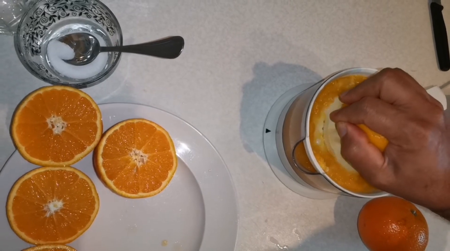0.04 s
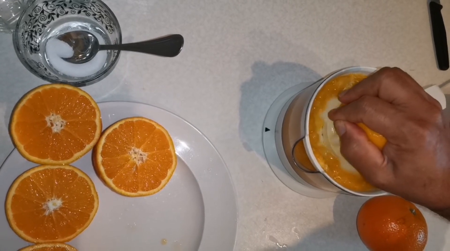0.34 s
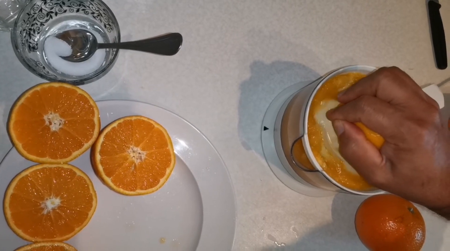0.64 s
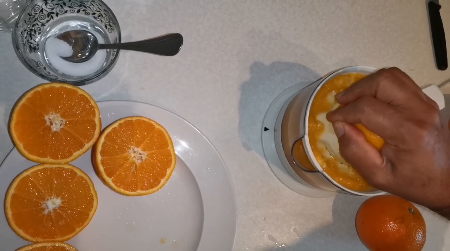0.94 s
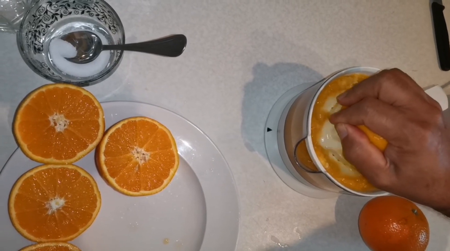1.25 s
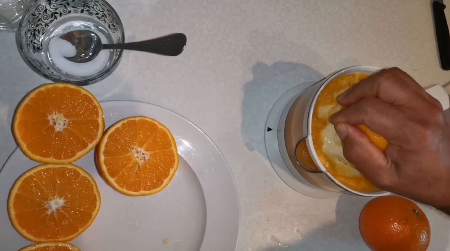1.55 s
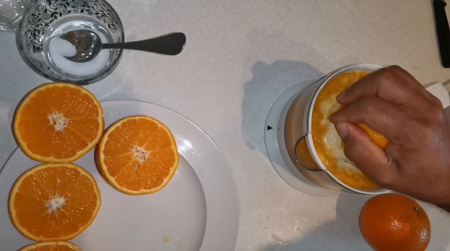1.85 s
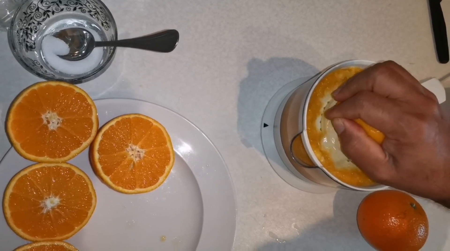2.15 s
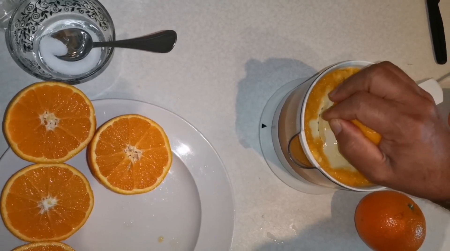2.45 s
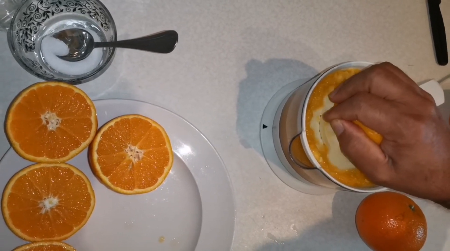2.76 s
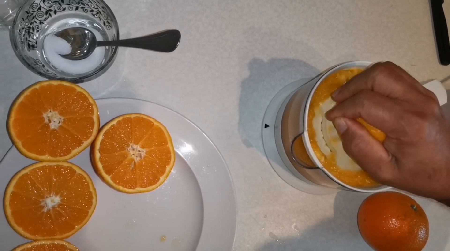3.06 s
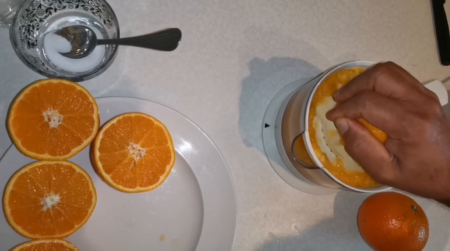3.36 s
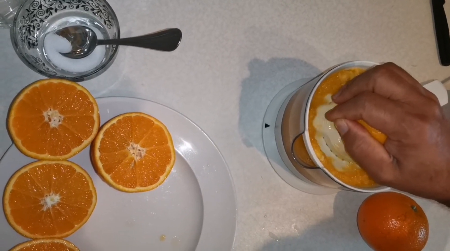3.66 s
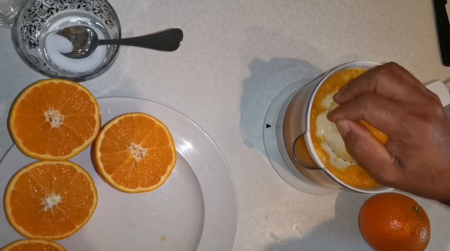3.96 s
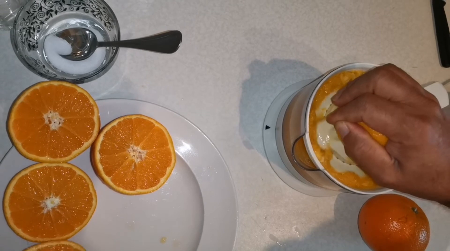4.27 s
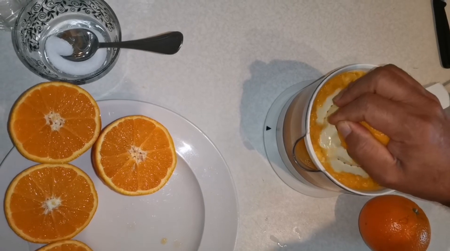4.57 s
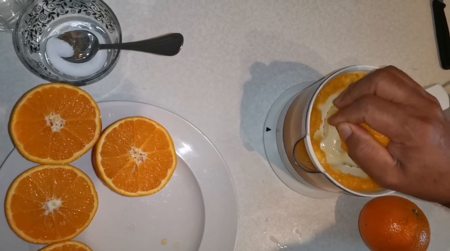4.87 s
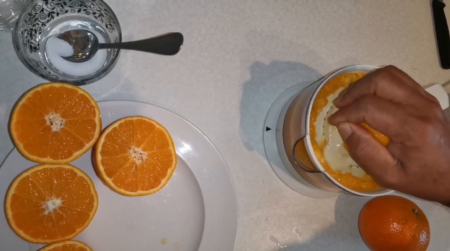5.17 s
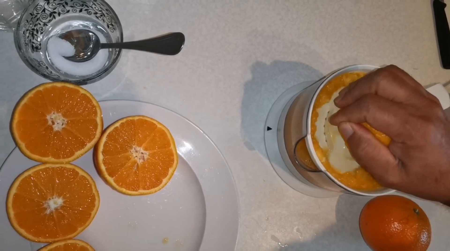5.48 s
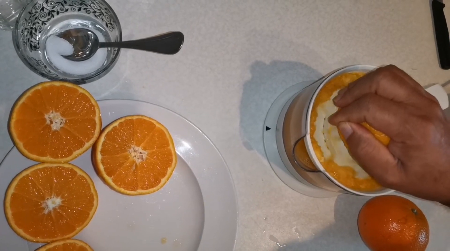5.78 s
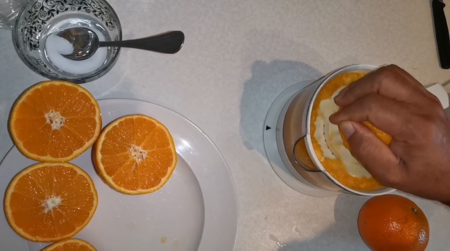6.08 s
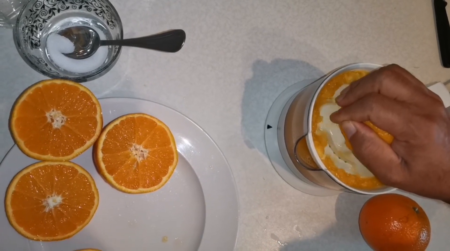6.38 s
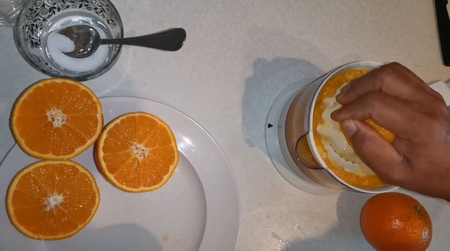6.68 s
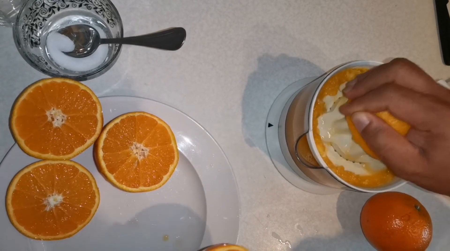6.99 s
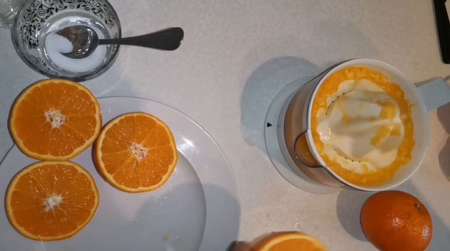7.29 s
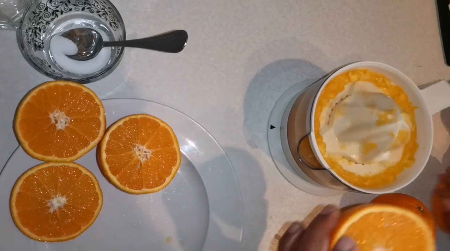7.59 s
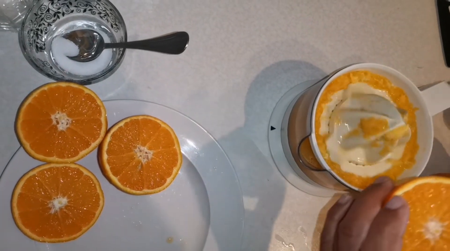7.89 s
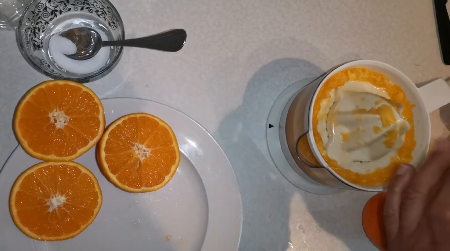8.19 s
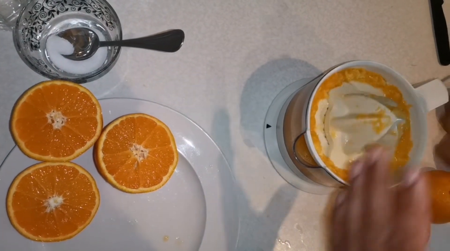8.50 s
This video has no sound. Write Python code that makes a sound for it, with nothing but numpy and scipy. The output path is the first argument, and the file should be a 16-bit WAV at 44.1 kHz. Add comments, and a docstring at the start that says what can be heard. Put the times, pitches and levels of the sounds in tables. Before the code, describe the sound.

Close up in a quiet kitchen, a juicer's motor and gears drone steadily as the reamer turns inside an orange half, with faint spits and pops of pulp. After about seven seconds the pressure comes off, and the spinning reamer breaks into a loud, irregular plastic clatter with hollow knocks and wet clicks.

```python
"""Citrus press on a kitchen counter

One microphone, close up, in a quiet kitchen. Half an orange is held on the reamer of an electric press.
The mains motor shakes a plastic gear train that growls in the housing; the fruit rumbles on the ribs,
pulp squelches, and later the rind catches and sings. Near the end the hand lets go, and the unloaded
reamer rattles and knocks loudly in its strainer."""
import sys
import numpy as np
from scipy import signal
from scipy.fft import rfft, irfft, next_fast_len
from scipy.io import wavfile
from scipy.ndimage import uniform_filter1d

SR = 44100
rng = np.random.default_rng(int(sys.argv[2]) if len(sys.argv) > 2 else 0)


def wrap_up_sound(samples):
    """Save the sound to the file named by the first command line argument, as 16-bit audio."""
    columns = np.atleast_2d(samples).T
    # keep every value between -1 and 1, then stretch to whole-number steps
    tamed = np.clip(columns, -1, 1)
    steps = np.round(tamed * 32767).astype(np.int16)
    wavfile.write(sys.argv[1], SR, steps)


N = 381024
TIME = np.arange(N) / SR
MAINS_HZ, WHEEL_HZ, REAMER_HZ, ROTOR_BEAT_HZ = 50, 6.485, 0.985, 41.75

# broad response of the strainer: (frequency [Hz], level [dB])
STRAINER_SLOPE = [(155, -17), (220, -23), (265, -12.5), (520, -17.5), (1000, -14.9), (1500, -14.0),
                  (2400, -10.0), (3000, -18.2), (4000, -25.0), (5800, -33.1), (8800, -37.7), (12300, -44.9),
                  (15500, -64.7)]
# resonances of the strainer's sound, and one shallow dip: (frequency [Hz], width [Hz], lift [dB])
STRAINER_MODES = [(384, 52, 13.5), (470, 26, 6), (606, 44, 7.6), (694, 47, 10), (742, 34, 4.5),
                  (920, 130, 6.7), (1295, 80, 6.5), (2230, 120, 4.5), (2468, 49, 4.5), (2700, 40, 4),
                  (2570, 200, 4.5), (4773, 720, 7), (5202, 188, 8), (5900, 900, -3), (7200, 400, 8.5),
                  (9480, 260, 12)]
# how wildly the free reamer shakes: (time [s], level [dB])
SHAKE = [(6.7, -4.5), (7.0, -12), (7.04, -3.5), (7.66, -0.5), (7.76, -6), (8.02, -4), (8.08, -11),
         (8.13, -2), (8.36, -7.5), (8.64, -1.5)]


def from_db(db):
    """Decibels to gain."""
    return 10 ** (np.asarray(db) / 20)


def rms_one(x):
    """Scale to rms 1."""
    return x / np.sqrt(np.mean(x ** 2) + 1e-20)


def band(x, low_hz, high_hz, order=2):
    """Causal band-pass."""
    sos = signal.butter(order, [low_hz, min(high_hz, .48 * SR)], "band", fs=SR, output="sos")
    return signal.sosfilt(sos, x + 1e-18)


def evened(x, size=3000):
    """Hold the rms at 1 over a window of so many samples; faster grain stays."""
    power = uniform_filter1d(uniform_filter1d(x ** 2, size=size), size=size * 3 // 4)
    return x / np.sqrt(power + 1e-14)


def curve(rows):
    """A (time, value) curve at every sample."""
    return np.interp(TIME, *np.transpose(rows))


def drift(hz):
    """A random wander of rms 1 that turns hz times a second."""
    knots = np.arange(0, TIME[-1] + 1, 1 / hz)
    return rms_one(np.interp(TIME, knots, rng.standard_normal(1000)[:len(knots)]))


def throb(hz, depth_db):
    """A periodic swell of force."""
    return from_db(depth_db * np.cos(2 * np.pi * (hz * TIME + rng.random())))


def turning(turn_hz, swells):
    """Gain that swells and sinks in the same way on every turn or cycle."""
    return from_db(sum(db * np.cos(2 * np.pi * k * turn_hz * (TIME - peak_s)) for k, db, peak_s in swells))


def grains(per_s, spread_db):
    """Clicks at random moments, of random sign and size."""
    clicks = (rng.random(N) < per_s / SR) * rng.choice([-1, 1], N)
    return clicks * from_db(spread_db * np.clip(rng.standard_normal(N), -2, 2))


def burst(decay_s, per_s, attack_s=0.0007):
    """A cluster of clicks that swells within milliseconds and dies away."""
    t = TIME[:SR // 12]
    cluster = rng.uniform(-1.06, 1, len(t)) * (rng.random(len(t)) < per_s / SR)
    return cluster * np.minimum(t / attack_s, 1) * np.exp(-t / decay_s) + 1e-12


def add(out, s, sound, db):
    """Mix a sound in at time s, with the energy of 5 ms at the given level."""
    start = int(s * SR)
    sound = sound * np.sqrt(.005 * SR) / np.linalg.norm(sound)
    out[start:start + len(sound)] += (from_db(db) * sound)[:N - start]


def body(x, slope, modes=()):
    """Ring a body: a causal filter made of a slope, its main resonances and a crowd of small high modes."""
    size = next_fast_len(N + SR // 2)
    hz = np.maximum(np.arange(size // 2 + 1) * SR / size, 1)
    points, levels = np.transpose(slope)
    db = np.interp(np.log(hz), np.log(points), levels)
    db -= 10 * np.log10(1 + np.minimum((.75 * points[0] / hz) ** 8, 1e4))   # bass falls away
    for centre, width, lift in modes:
        db += lift / (1 + (2 * (hz - centre) / width) ** 2)
    crowd_hz = np.arange(2800, 16000, 70)
    db += np.interp(hz, crowd_hz, rng.normal(0, 2.3, len(crowd_hz)), left=0)
    cepstrum = irfft(np.log(from_db(db)), size)
    minimum_phase = np.exp(rfft(2 * cepstrum[:size // 2], size) - cepstrum[0])
    return irfft(rfft(x, size) * minimum_phase, size)[:N]


def kitchen(x, wet_db, t60):
    """Direct sound at the microphone plus a short diffuse tail off tiles and cupboards."""
    t = TIME[:SR // 2]
    tail = rng.standard_normal(len(t)) * from_db(-60 * t / t60) * (t > .004)
    return x + from_db(wet_db) * signal.fftconvolve(x, tail / np.linalg.norm(tail))[:N]


def room_tone():
    """The still air of the kitchen, faint behind the press."""
    # spectrum of the air: (frequency [Hz], level [dB])
    air_slope = [(20, -14), (50, -11), (200, -8.5), (1000, -6), (5000, -24), (15000, -49)]
    return from_db(-55) * rms_one(body(rng.standard_normal(N), air_slope))


def gears(freed):
    """Tooth contacts ring the housing and chug with each turn of the out-of-true wheel."""
    # broad response of the housing: (frequency [Hz], level [dB])
    housing_slope = [(450, -36), (560, -28.5), (680, -13), (1000, -12), (1400, -26), (2050, -20.5),
                     (2700, -22), (3700, -45), (4600, -40), (5700, -60.5), (8500, -58.5), (12000, -50.5),
                     (15500, -75)]
    # resonances of the gear sound, and one narrow dip in the growl: (frequency [Hz], width [Hz], lift [dB])
    gear_modes = [(701.8, 19, 8.5), (755, 46, 8.5), (768, 18, -10.5), (862, 68, 6), (1170, 120, 0.5),
                  (1277, 156, 14.5), (1575, 71, 11), (2390, 244, 14), (2590, 96, 8), (3300, 480, 19),
                  (4860, 520, 4.5), (5290, 210, 15.5), (6400, 930, 18.5)]
    # meshing tones: (frequency [Hz], level against the growl's noise [dB])
    mesh_tones = [(691.8, -2), (701.6, -5), (714.6, -5), (743.5, -5), (750, -10)]
    # the low growl, and the push of the hand heard as clatter: (time [s], level [dB])
    growl_levels = [(0, -34), (0.35, -36.5), (.7, -34), (1.1, -34), (1.7, -32.5), (2.1, -34), (2.8, -34),
                    (3.25, -32), (3.5, -36.5), (3.72, -37.5), (3.85, -33), (4.33, -36), (4.5, -34),
                    (5.5, -34.5), (5.72, -37.5), (6.15, -34), (6.36, -35.5), (6.55, -34), (6.72, -33),
                    (6.85, -57), (7.2, -40.5)]
    push_levels = [(0, -37), (0.8, -37.5), (2.15, -35.5), (2.5, -37), (3.55, -36), (3.82, -35.5),
                   (5.8, -36.5), (6.7, -34.5), (6.93, -32)]
    # periodic swells, each (swells per cycle [count], depth [dB], peak time [s])
    torque_pulses = [(1, 1.35, .0055), (2, .35, .0023)]   # twice per mains cycle
    rotor_beat = [(1, .7, .0105)]   # the rotor beats against the gears
    rib_bite = [(1, .7, .02), (2, .4, .455), (3, .45, .06)]   # the ribs bite the fruit alike on every turn
    wheel_growl = [(1, 2.9, .134), (2, .5, .014), (3, 1.0, .04)]   # the wheel's chug in three bands
    wheel_clatter = [(1, 1.3, .152)]
    wheel_whine = [(1, 1.3, .013), (2, .85, .007), (3, .3, .049)]
    # strength of the chug in growl and clatter: (time [s], depth [factor])
    chug_depths = [(0, 1.3), (.8, 1), (1.4, 0.82), (2.9, 0.6), (3.5, 0.34), (4.4, 0.72), (5.1, 0.63),
                   (5.9, 1.1), (6.6, 0.93)]
    # the teeth catch on some turns: (time [s], half length [s], whine lift [dB], rasp lift [dB])
    catches = [(1.083, .035, 3, -2), (1.17, 0.046, -7, 2.5), (3.08, .025, 4.5, -9), (3.165, 0.045, -3.5, 2),
               (3.397, 0.039, 5.5, 2), (4.17, 0.04, 4, -1), (4.782, 0.019, 6.5, -9), (6.022, 0.017, 8, 3),
               (6.106, 0.034, 6, -10), (6.185, 0.012, 7, 5), (6.303, .055, -3, 6.5)]

    torque = turning(2 * MAINS_HZ, torque_pulses)
    contacts = grains(per_s=12000, spread_db=3) * torque
    housing = body(kitchen(contacts, wet_db=-6.5, t60=0.23), housing_slope, gear_modes)
    mesh = sum(from_db(db) * np.sqrt(2) * np.sin(2 * np.pi * hz * TIME + .4 * drift(4))
               for hz, db in mesh_tones)
    chug = curve(chug_depths)
    growl = evened(rms_one(band(housing, 590, 811, order=5)) + mesh, size=1000)
    growl *= from_db(curve(growl_levels)) * turning(WHEEL_HZ, wheel_growl) ** chug
    clatter = evened(band(housing, 825, 1875, order=5), size=1500)
    clatter *= turning(WHEEL_HZ, wheel_clatter) ** chug
    whine_db, rasp_db = -14, -19   # against the clatter
    for s, half_s, whine_lift, rasp_lift in catches:
        catch = np.exp(-np.minimum(((TIME - s) / half_s) ** 2, 20))
        whine_db += whine_lift * catch
        rasp_db += rasp_lift * catch
    whine = from_db(whine_db) * evened(band(housing, 1954, 2983, order=5))
    whine *= turning(WHEEL_HZ, wheel_whine)
    rasp = from_db(rasp_db) * evened(band(housing, 2890, 4000, order=5))
    sliding_hiss = from_db(-58.5) * evened(band(housing, 3910, 15300, order=5)) * (1 - freed)
    push = from_db(curve(push_levels) - 10 * freed)   # the teeth ease once the load is off
    sound = torque * (growl + push * (whine + rasp))
    sound += np.sqrt(torque) * (push * clatter + sliding_hiss)
    return sound * turning(ROTOR_BEAT_HZ, rotor_beat) * turning(REAMER_HZ, rib_bite)


def motor(freed):
    """Mains hum, weaker without load, and the fruit rumbling on the ribs; both swell with each turn."""
    # motor hum: (frequency [Hz], level [dB])
    hum_tones = [(50, -73), (100, -63), (300, -70)]
    # drag on the reamer: (swells per turn [count], depth [dB], peak time [s])
    drag_swells = [(1, 2.2, 0.76), (2, 1.2, 0.38), (3, 1.3, 0.011)]
    # grip of the fruit on the ribs, heard as rumble: (time [s], level [dB])
    grip_levels = [(0, -51), (0.95, -54.5), (1.85, -51), (2.75, -53), (3.45, -50.5), (3.8, -52.5),
                   (4.3, -52), (4.75, -55), (5.7, -50.5), (6.5, -54.5), (6.87, -44), (7.15, -51)]
    # broad response of the motor base on the counter: (frequency [Hz], level [dB])
    base_slope = [(85, -22), (102, 2.5), (170, 6), (225, -15), (260, -0.5), (390, 9), (470, -15),
                  (3000, -51), (12000, -83)]
    # its resonances: (frequency [Hz], width [Hz], lift [dB])
    base_modes = [(93.6, 13.8, 16.5), (147.8, 18, 10.8), (280, 44, 9.1)]
    hum = sum(from_db(db) * np.sqrt(2) * np.sin(2 * np.pi * (hz * TIME + rng.random()))
              for hz, db in hum_tones)
    rumble = evened(body(grains(per_s=830, spread_db=9.5), base_slope, base_modes))
    drag = turning(REAMER_HZ, drag_swells)
    return drag * (from_db(-14 * freed) * hum + from_db(curve(grip_levels)) * rumble)


def bubbles(hz, length_s, count=4, ring_s=.001, rise_per_s=5):
    """A few bubbles in quick succession, each a soft ping that rises in pitch."""
    born = 2 * length_s * np.arange(count)[:, None] / count
    age = np.maximum(TIME[:SR // 12] - born, 0)
    pitch = hz * (1 + .02 * rng.standard_normal((count, 1)))
    phase = 2 * np.pi * pitch * age * (1 + rise_per_s * age)
    return np.sum(age * np.exp(-age / ring_s) * np.sin(phase), axis=0)


def pulp(freed, tick_decay_s=0.0058):
    """Bursting juice sacs bubble and spit droplets; lone ones tick, and the smallest fizz softly."""
    # sacs burst: (time [s], decay [s], bubble level [dB], pitch [Hz], spray level [dB], spray top [Hz])
    squelches = [(.1525, 0.003, -54, 6000, -49, 11500), (.321, 0.0098, -53, 5800, -53.5, 15500),
                 (0.499, .024, -56, 6110, -52.5, 15500), (.558, 0.014, -63, 6190, -55, 15000),
                 (0.6485, 0.004, -51, 6050, -49, 14500), (.833, 0.0076, -44, 4470, -57.5, 8100),
                 (1.639, .02, -62, 4830, -57, 13000), (3.53, .008, -51, 6240, -55, 15500),
                 (3.569, 0.013, -52, 4770, -57, 15000), (3.639, .025, -50, 4700, -58, 10000),
                 (4.543, .005, -60, 6150, -52.5, 14000), (4.569, .004, -59, 5940, -54.5, 13500),
                 (5.231, 0.011, -46, 7150, -52, 12500), (5.657, 0.025, -52, 4970, -57, 11500),
                 (5.687, 0.0064, -33, 4900, -47, 8800), (5.781, 0.0091, -44, 4200, -52.5, 10000),
                 (6.253, 0.0046, -51, 6200, -52.5, 12500), (6.675, .0053, -49, 4600, -57, 13500)]
    # a sac snaps or a drop is flung against the bowl: (time [s], level [dB], pitch [Hz])
    ticks = [(.123, -58, 12000), (.463, -57, 12000), (.878, -51, 4340), (1.157, -55, 7000),
             (1.9235, -52, 6230), (2.1909, -52, 6240), (2.623, -49, 4650), (2.852, -53, 4380),
             (3.693, -53, 7540), (3.761, -47, 4830), (4.292, -47, 4840), (4.3143, -47, 6900),
             (4.671, -50, 8050), (5.0725, -48, 8100), (5.574, -50.5, 9000), (6.594, -48.5, 6150),
             (6.708, -46, 4830), (7.177, -40, 5470), (7.198, -42, 6500), (7.238, -40, 5000),
             (7.261, -42, 5500), (7.3, -38, 5500), (7.359, -40, 5550), (7.444, -35, 5000),
             (7.589, -33.5, 5200), (7.628, -37, 5000), (8.138, -35, 5000), (8.43, -47.5, 5100),
             (8.529, -34, 5000)]
    # spray of tiny droplets: (frequency [Hz], level [dB])
    spray_slope = [(4500, 9.5), (6200, 9.5), (9000, 4), (12000, 6), (15500, -3)]
    # the dip that the bowl leaves in it: (frequency [Hz], width [Hz], lift [dB])
    bowl_dip = [(5360, 370, -6)]
    pops, spray = np.zeros(N), np.zeros(N)
    for s, decay_s, db, hz, spray_db, top_hz in squelches:
        add(pops, s, bubbles(hz, decay_s), db)
        droplets = burst(decay_s, per_s=1500, attack_s=0.4 * decay_s)
        add(spray, s, band(droplets, 4100, top_hz, order=5), spray_db)
    for s, db, hz in ticks:
        add(pops, s, band(burst(tick_decay_s, per_s=5000), hz / 1.15, hz * 1.07, order=1), db)
    small_sacs = sum(band(grains(per_s=22, spread_db=3), .85 * hz, 1.15 * hz) / np.sqrt(hz)
                     for hz in np.geomspace(4300, 11000, 10))
    small_sacs = signal.fftconvolve(small_sacs, burst(tick_decay_s, per_s=4000))[:N]
    fizz = from_db(-68.5 + 2.7 * drift(18)) * rms_one(small_sacs) * (1 - freed)   # comes in clumps
    pops = kitchen(pops, wet_db=-8, t60=.25)
    return pops + kitchen(body(spray, spray_slope, bowl_dip) + fizz, wet_db=-8, t60=.28)


def rind():
    """The rind sticks and slips: rough tones that swell and fade, pulsed by the motor."""
    # the rind catches on the reamer and sings: (start [s], length [s], pitch [Hz], level [dB])
    rubs = [(4.59, 1.64, 1290, -38.5), (5.843, 1.4, 1330, -38), (6.802, 0.25, 947, -32.5)]
    slips = signal.sosfilt(signal.butter(2, 48, fs=SR, output="sos"), rng.standard_normal((2, N)))
    out = np.zeros(N)
    for start, length, hz, db in rubs:
        swell = np.sin(np.pi * np.clip((TIME - start) / length, 0, 1))
        phase = 2 * np.pi * hz * TIME
        out += from_db(db) * swell * evened(slips[0] * np.cos(phase) + slips[1] * np.sin(phase))
    return out * throb(MAINS_HZ, depth_db=3.5)


def reamer(freed):
    """The unloaded reamer chatters in the strainer; harder shaking brings more thud and edge."""
    # surges with the gear wheel: (swells per turn [count], depth [dB], peak time [s])
    surges = [(1, 1.5, 0.14), (2, .5, 0.121)]
    chatter = grains(per_s=2200, spread_db=2) * throb(2 * MAINS_HZ, depth_db=2.4)
    chatter *= from_db(1.7 * drift(100))
    strainer = body(kitchen(chatter, wet_db=-6.5, t60=0.3), STRAINER_SLOPE, STRAINER_MODES)
    shake_db = curve(SHAKE)
    graze_db = 4 * (1 - freed)   # the fruit still grazes the ribs
    thud = from_db(-34.5 + shake_db) * evened(band(strainer, 171, 546, order=4))
    rattle = from_db(-29 + 0.47 * shake_db + graze_db) * evened(band(strainer, 628, 3960, order=4))
    edge = from_db(-44 + shake_db) * evened(band(strainer, 4480, 17400, order=4))
    fade_in = np.interp(TIME, [6.72, 6.93], [0, 1])
    return (thud + rattle + edge) * turning(WHEEL_HZ, surges) * fade_in


def rim_and_bowl(rim_width_hz=170):
    """Ribs skim the strainer's rim, ringing a narrow band; the wobbling reamer bumps the bowl."""
    # skims, pitched by the spot they hit: (time [s], decay [s], level [dB], pitch [Hz])
    skims = [(6.787, 0.012, -19.5, 1280), (6.889, 0.0035, -26, 870), (6.908, .005, -24.5, 955),
             (6.928, .004, -26, 890), (6.946, 0.043, -22, 2570), (7.091, 0.0036, -27, 1780),
             (7.133, 0.0045, -28, 2120), (7.198, 0.0033, -35, 2470), (7.218, 0.0046, -33, 2520),
             (7.418, .005, -34, 2480), (7.546, .007, -24, 2490), (7.814, 0.023, -39, 2530),
             (7.883, 0.0033, -27, 2530), (7.953, 0.0057, -32, 2580), (8.007, 0.0054, -26, 1180),
             (8.13, 0.0048, -25, 2260), (8.193, 0.018, -28.5, 2630), (8.351, .007, -25, 2500),
             (8.48, .0064, -29, 2610)]
    # low, hollow bumps: (time [s], decay [s], level [dB])
    bumps = [(7.235, 0.015, -22.5), (7.35, 0.012, -29.5), (7.43, 0.023, -21.5), (8.527, 0.012, -20.5),
             (8.583, 0.0049, -24.5), (8.607, 0.023, -19.5)]
    rim, bowl = np.zeros(N), np.zeros(N)
    for s, decay_s, db, hz in skims:
        add(rim, s, band(burst(decay_s, per_s=2600), hz - rim_width_hz / 2, hz + rim_width_hz / 2), db)
    for s, decay_s, db in bumps:
        push = burst(decay_s, per_s=3000, attack_s=0.0052)
        add(bowl, s, band(push, 343, 423) + 0.68 * band(push, 584, 690), db)
    return kitchen(rim + bowl, wet_db=-7.5, t60=0.22)


def knocks():
    """A hard contact and quick bounces ring the strainer, with a wet crack that grows with the shaking."""
    # the reamer strikes the strainer: (time [s], blow level [dB], decay [s])
    strikes = [(6.909, -22, 0.011), (6.946, -6, 0.02), (6.9664, -16, 0.005), (7.029, -5, 0.01),
               (7.0506, -5.5, .002), (7.0903, 2, 0.034), (7.1374, -10, 0.0049), (7.1777, -7, .006),
               (7.1967, 1.5, 0.065), (7.2365, -2.5, 0.025), (7.256, -7, 0.009), (7.3516, -1, 0.0074),
               (7.418, -3.5, 0.01), (7.443, 1.5, 0.021), (7.6246, 3, 0.046), (7.662, -6, 0.017),
               (8.008, -3, 0.033), (8.11, -6.5, 0.0135), (8.1357, -8.5, 0.0085), (8.194, -6, 0.013),
               (8.422, -6, 0.0076), (8.4802, -7.5, 0.0034), (8.522, -3, 0.024), (8.603, 1.5, 0.058)]
    blows, cracks = np.zeros(N), np.zeros(N)
    for s, db, decay_s in strikes:
        bounces = burst(decay_s, per_s=2300)
        bounces[0] += .25 * np.linalg.norm(bounces)   # the first contact
        add(blows, s, bounces, db)
        shake_db = np.interp(s, *np.transpose(SHAKE))
        add(cracks, s, bounces, -20.5 + 3.6 * shake_db)
    ring = body(blows, STRAINER_SLOPE, STRAINER_MODES)
    crack = band(band(cracks, 4400, 4950, order=1), 280, 15000, order=6)
    return kitchen(ring + crack, wet_db=-18, t60=0.14)


def scene():
    """The press on the counter, close to one microphone."""
    release_s, release_length_s = 6.87, 0.3   # the hand lets go
    freed = np.clip((TIME - release_s) / release_length_s, 0, 1)   # 0 pressed, 1 running free
    mono = (room_tone() + gears(freed) + motor(freed) + rind()
            + reamer(freed) + knocks() + rim_and_bowl() + pulp(freed))
    return mono[None]


def record(dry):
    """The highest treble is softened, then cut steeply."""
    rolloff_hz, cutoff_hz = 15000, 15750
    soft = signal.sosfilt(signal.butter(3, rolloff_hz, fs=SR, output="sos"), dry)
    return signal.sosfilt(signal.ellip(12, .1, 90, cutoff_hz, fs=SR, output="sos"), soft)


dry = scene()
out = record(dry)
wrap_up_sound(out)
```